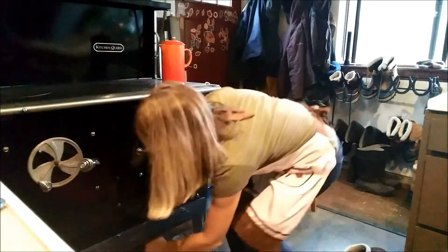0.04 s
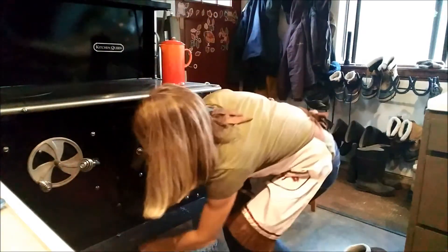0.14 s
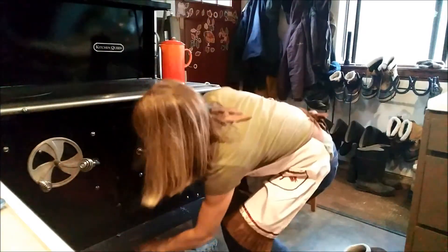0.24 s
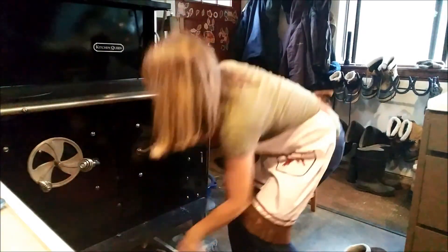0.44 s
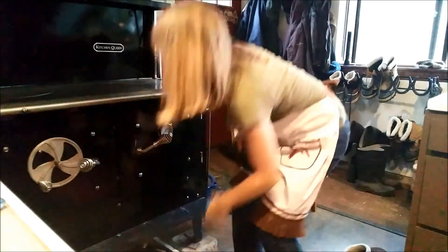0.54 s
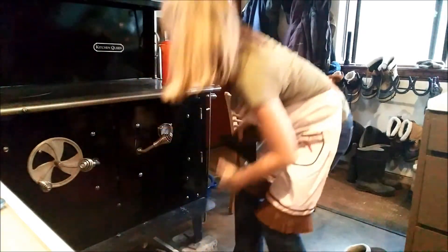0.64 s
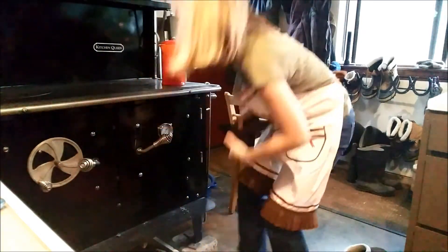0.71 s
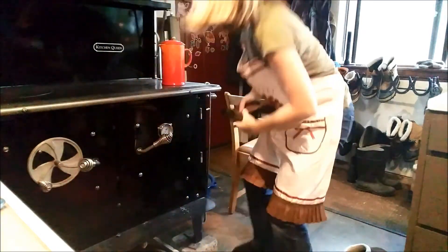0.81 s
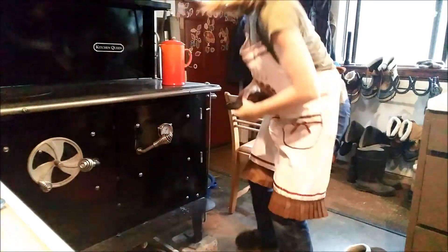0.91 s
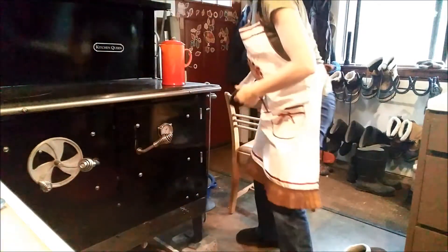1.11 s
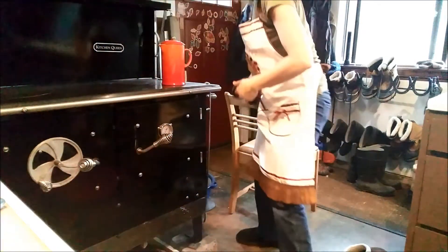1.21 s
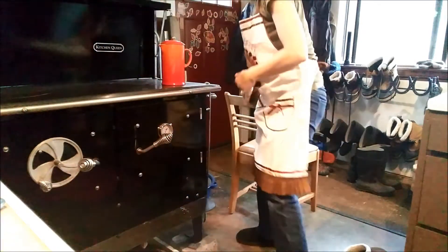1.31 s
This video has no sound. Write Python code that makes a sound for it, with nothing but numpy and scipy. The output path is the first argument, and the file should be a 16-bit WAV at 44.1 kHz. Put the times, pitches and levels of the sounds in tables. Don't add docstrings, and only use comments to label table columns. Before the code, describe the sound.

A heavy iron stove door shuts: faint handle knocks and a quick latch scrape, two loud rattling clanks, a fading ring, then slight cloth rustle and a soft shoe step, close stereo microphone in a small kitchen.

```python
import sys
import numpy as np
from scipy import signal
from scipy.fft import rfft, irfft, next_fast_len
from scipy.io import wavfile
from scipy.ndimage import uniform_filter1d, map_coordinates

SR = 44100
rng = np.random.default_rng(int(sys.argv[2]) if len(sys.argv) > 2 else 0)


def log_audio(samples):
    frames = np.atleast_2d(samples).T
    limited = np.clip(frames, -1, 1)
    pcm = np.round(limited * 32767).astype(np.int16)
    wavfile.write(sys.argv[1], SR, pcm)


def nominal_scale(level):
    x = np.asarray(level, float) / 20
    return 10 ** x


N = 59535

# t/s, level/dB, rattle/s, strongest f/Hz, brightness/dB per octave
CLANKS = [
    (0.2397, -17.5, 0.11, 5650, -2),
    (.276, -18, 0.017, 8650, -1.5),
    (.298, -26, 0.0097, 650, -2.5),
    (0.3186, -13, 0.019, 5420, 1),
    (.333, -15, 0.008, 672, 0.5),
    (.352, -15, 0.024, 1201, 0),
    (.498, -44.5, 0.0072, 5510, 1.5),
    (0.5064, -35, 0.0057, 4250, -2.5),
    (0.524, -44, 0.0034, 4100, -4.5),
]
# f/Hz, level/dB per Hz
IRON = [(60, -47.5), (250, -30), (600, -8), (1200, -7.5), (2500, -7.5), (5500, -3), (11000, -3.5),
        (16000, -4.5)]
# f/Hz, t60/s
IRON_T60 = [(80, 1.09), (300, 0.97), (700, 0.44), (2000, 0.45), (4500, 0.23), (10000, 0.19), (15000, 0.14)]
# f/Hz, level/dB
GLANCE = [(300, -7), (600, -2.5), (1000, -2), (1800, -7), (2400, 3.5), (4000, 0), (15000, -3)]
# t/s, level/dB, f/Hz
THUDS = [(.299, -22.5, 590), (.328, -24, 710), (.343, -23.5, 670), (0.32, -18, 1095), (.366, -24, 660),
         (.35, -25.5, 1750), (0.36, -22, 2700)]
LATCH_HZ = [5215, 5585, 5760, 5955, 6325, 6728, 8265]
LATCH_LEVEL_DB = [-10, -10.5, -6, -8, 2, -6.5, -6]
FRAME_HZ = [3931, 4490, 5215, 5412, 5455, 6728, 7926, 8074, 10665, 11254, 11524, 11974]
FRAME_LEVEL_DB = [-14, -6.5, -4.5, -6.5, -6, -5, -1, -4, -5.5, -11.5, -11.5, -11.5]
FRAME_T60 = [.4, .3, .28, .33, .28, .22, .25, .2, .17, .2, .2, .24]
PLATE_HZ = [305, 377, 541, 565, 625, 707, 765, 920, 1105, 1292, 1823]
# level/dB, t60/s
PLATES = [(-22.5, 0.46), (-19.5, 0.77), (-20.5, 1), (-20, 0.41), (-16, 0.76), (-9.5, 0.55), (-16.5, 0.37),
          (-9, 0.26), (-4.5, 0.26), (-9, 0.26), (-11, 0.31)]
DAMPER_HZ = [3220, 3750, 4250, 4800, 5740, 7010]
# level/dB, t60/s
DAMPER = [(4.5, .2), (2, .2), (-1.5, 0.32), (-7, 0.11), (-8, 0.13), (-10, 0.11)]
# f/Hz, level/dB, t60/s
BELLY = [(79.6, -2, 1.2), (125, -4, 1), (160, -3.5, 1.2), (286.3, -5.5, 1.2)]
# f/Hz, level/dB, t60/s
SETTLE = [(294.3, -40, 0.4), (454, -57.5, 1)]
# f/Hz, t60/s
KITCHEN_T60 = [(300, .7), (2000, 0.44), (6000, 0.61), (15000, .5)]
# f/Hz, twin f/Hz
SING_HZ = [(1185, 1198), (1725.5, 1729), (1994, 1997.2), (2218, 2221)]
# level/dB, t60/s, twin share, left-right turn/rad
SING = [(-32.5, .75, 1, 0.45), (-27, .75, 0.05, 0.73), (-36, 1.6, .1, 1), (-36.5, 0.92, 0.66, 0.53)]
# t/s, level/dB
MUTE = [(0, 0), (.72, 0), (.79, -11), (1.0, -11), (1.1, -20), (1.35, -20)]
# t/s, level/dB, rattle/s
KNOCKS = [
    (.078, -56.5, .04),
    (.103, -47, 0.0024),
    (.1105, -46, 0.0041),
    (.135, -54, 0.008),
    (.157, -50.5, 0.015),
    (.2068, -48.5, 0.004),
    (.221, -43.5, .01),
]
HANDLE_HZ = [300, 484, 673, 974, 1222, 1690, 2550, 3155]
# width/Hz, level/dB
HANDLE = [(50, -12), (50, -4.5), (50, 3), (50.1, -12.5), (45, -2), (69, -14.5), (69.6, -11.5),
          (71.05, -20.5)]
# f/Hz, level/dB per Hz
HANDLE_TICK = [(200, -27), (1000, -16.5), (2200, -15), (3100, -26), (3800, -37), (6000, -42),
               (15000, -43.5)]
# f/Hz, level/dB, t60/s
KNOB = [(668, -34, .12), (505, -43, .25), (1222, -42, .2), (974, -50, .2)]
# t/s, level/dB, f/Hz
TEETH = [
    (.172, -60, 7700),
    (.2068, -48, 5100),
    (.22, -43, 5350),
    (.2257, -38, 4690),
    (.233, -35.5, 5340),
]
# t/s, level/dB
SCRAPE = [(.19, -62), (.203, -54.5), (.218, -47.5), (.228, -40), (.2385, -34), (.242, -66)]
# f/Hz, level/dB per Hz
SCRAPE_COLOUR = [(120, -45), (200, -27), (671, -9), (1020, -15), (1240, -5), (1410, -18), (3870, -17),
                 (5260, -11), (15000, -28)]
# t/s, level/dB
FADING = [(0, -64), (.05, -66), (.1, -64)]
# f/Hz, level/dB per Hz
FADING_COLOUR = [(88, -70), (150, -31), (310, -1.5), (518, -25), (800, -6), (1040, -14), (1670, -12),
                 (3500, -27), (4550, -58), (7700, -120)]
# t/s, level/dB
RUSTLE = [(.775, -64.5), (.8, -64.5), (.822, -67), (.845, -67), (.87, -70)]
# f/Hz, level/dB per Hz
CLOTH = [(800, -9.5), (3000, -2.5), (5500, -2.5), (8000, -4), (14000, -9.5)]
# t/s, level/dB, f/Hz
SNAPS = [(.797, -75, 8000), (.808, -64, 5000), (.829, -70, 6700), (.837, -63, 7000), (.839, -63, 5000),
         (.846, -61, 8100)]
STEP_S = [1.1715, 1.184, 1.204, 1.2255, 1.2365, 1.25, 1.278]
STEP_HZ = [500, 378, 460, 373, 380, 330, 500]
# level/dB, length/s
STEPS = [(-55, 0.006), (-56.5, 0.016), (-63, 0.014), (-53, 0.021), (-59, 0.0073), (-59.5, 0.015),
         (-63.5, 0.0064)]
# share of the push's f, level/dB
BOARD = [(.85, 0), (1.25, -3), (2.1, -12)]
# f/Hz, level/dB per Hz
SOLE = [(150, -34.5), (400, 8), (900, -18), (1500, -21), (4000, -27)]
# t/s, level/dB
WEIGHT = [(1.2, -87), (1.25, -58), (1.29, -68), (1.35, -72)]
# f/Hz, level/dB per Hz
HUM = [(30, -14), (60, 0.5), (150, -12.5), (300, -17), (600, -6.5), (1100, -20), (3000, -28.5),
       (15000, -26)]
# t/s, level/dB
HUM_DB = [(0, -63.5), (1, -65.5), (1.35, -65)]
# f/Hz, likeness
ALIKE = [(60, 0.95), (300, 0.87), (700, 0.16), (1500, 0.21), (15000, 0.017)]
# f/Hz, level/dB
LEFT = [(2000, 0), (5500, -1), (8000, -5), (9200, -9), (11000, 8.5), (12500, -2.5), (14000, -5.5),
        (15600, -12.5)]
# f/Hz, level/dB
RIGHT = [(2000, 0), (5500, 1), (8000, 5), (9200, -1.5), (11000, -12), (12500, -7), (14000, -18),
         (15600, -16.5)]

FOCUS_DB, FOCUS_OCTAVES = 4.5, 0.4
CLUMP_DB, CLUMP_HZ = 1.8, 200
LATCH_S, FRAME_S, PLATE_S, BELLY_S = .2405, .319, .32, .31
LATCH_DB, FRAME_DB, PLATE_DB, BELLY_DB = -18, -17, -18.5, -45.5
LATCH_T60, THUD_T60, TOOTH_T60, SNAP_T60 = .2, .086, .06, .06
BELLY_RISE_S = 0.12
DAMPER_S, DAMPER_DB = .506, -44
SETTLE_S, KNOB_S = .425, .1105
KITCHEN_S, KITCHEN_DB = .335, -34
HEEL_DB = -64
LAG_S = .0002
NOTCH_HZ, NOTCH_WIDTH_HZ, NOTCH_DB = 9090, 350, -8.5
TOP_HZ, CLIP = 15660, 1.15


def unit(x):
    return x / np.sqrt(np.mean(x ** 2) + 1e-20)


def along(points, hz):
    f, v = np.transpose(points)
    return np.interp(np.log(hz + 1), np.log(f + 1), v)


def level(rows):
    s, db = np.transpose(rows)
    return nominal_scale(np.interp(np.arange(N) / SR, s, db, left=-140, right=-140))


def filtered(x, response):
    m = next_fast_len(x.shape[-1] + 8192)
    spectrum = rfft(x, m) * response(np.fft.rfftfreq(m, 1 / SR))
    return irfft(spectrum, m)[..., :x.shape[-1]]


def causal(db):
    c = irfft(np.log(nominal_scale(db) + 1e-6))
    half = c.shape[-1] // 2
    return np.exp(rfft(c * np.r_[1, np.full(half - 1, 2), 1, np.zeros(half - 1)]))


def pair(size):
    def shares(hz):
        turn = np.arccos(np.clip(along(ALIKE, hz), -1, 1)) / 2
        return np.array([np.cos(turn), np.sin(turn)])

    mid, side = filtered(rng.standard_normal((2, size)), shares)
    return np.array([mid + side, mid - side])


def add(out, s, x):
    part = out[:, round(s * SR):][:, :x.shape[1]]
    part += x[:, :part.shape[1]]


def grit(size, spread_db):
    return rng.standard_normal(size) * nominal_scale(spread_db * rng.exponential(size=size))


def contact(rattle_s, t60s, colour, size):
    hz, t, z = signal.stft(pair(size), SR, nperseg=128)
    dying = z * nominal_scale(-60 * t / t60s(hz)[:, None])
    tail = signal.istft(dying, SR, nperseg=128)[1][:, :size]
    u = np.arange(SR // 10) / SR
    hits = rng.random(len(u)) < .03
    rattle = hits * grit(len(u), spread_db=2.5) * np.exp(-u / max(rattle_s, .001))
    rattle[0] = 6.5
    knots = rng.standard_normal(1000)
    clumps = lambda hz: causal(CLUMP_DB * map_coordinates(knots, [hz / max(CLUMP_HZ, 30)]))
    struck = signal.fftconvolve(tail, rattle[None], axes=1)[:, :size]
    x = filtered(struck, lambda hz: colour(hz) * clumps(hz))
    return x / np.sqrt(np.mean(x[:, :SR // 25] ** 2))


def ring(modes, attack_s, beat, split):
    t, x = np.arange(SR) / SR, 0
    for hz, db, t60 in modes:
        d = rng.standard_normal((2, 2, 1))
        turn = d[0] * (.35 + min(hz / 2000, .9))
        wave = np.sin(2 * np.pi * hz * t + turn)
        twin = np.sin(2 * np.pi * hz * (1 + split) * t + turn)
        x = x + nominal_scale(db + d[1] - 60 * t / t60) * (wave + beat * twin)
    return x * (1 - np.exp(-t / attack_s))


def ticks(rows, t60):
    out = np.zeros((2, N))
    for s, db, pitch_hz in rows:
        bunch = [(pitch_hz * share, -5, t60) for share in (.95, 1, 1.06)]
        add(out, s, nominal_scale(db) * ring(bunch, .001, beat=.5, split=.015))
    return out


def rub(rows, colour, spread_db):
    x = pair(N) * np.abs(grit(N, spread_db))
    return level(rows) * unit(filtered(x, lambda hz: nominal_scale(along(colour, hz))))


def clanks():
    out = np.zeros((2, N))
    for k, (s, db, rattle_s, focus_hz, tilt_db) in enumerate(CLANKS):
        def colour(hz):
            octaves_off = np.log2((hz + 1) / focus_hz)
            focus = FOCUS_DB * np.exp(-(octaves_off / FOCUS_OCTAVES) ** 2)
            tilt = tilt_db * np.log2((hz + 50) / 3000)
            glance = (k == 0) * along(GLANCE, hz)
            return causal(along(IRON, hz) + glance + tilt + focus)

        blow = contact(rattle_s, lambda hz: along(IRON_T60, hz), colour, size=SR * 3 // 4)
        add(out, s, nominal_scale(db) * blow)
    return out


def door_parts():
    out = np.zeros((2, N))
    latch_modes = [(hz, db, LATCH_T60) for hz, db in zip(LATCH_HZ, LATCH_LEVEL_DB)]
    frame_modes = np.c_[FRAME_HZ, FRAME_LEVEL_DB, FRAME_T60]
    add(out, SETTLE_S, ring(SETTLE, 0.015, beat=0.15, split=0.023))
    add(out, LATCH_S, nominal_scale(LATCH_DB) * ring(latch_modes, 0.003, beat=0.45, split=0.0034))
    add(out, FRAME_S, nominal_scale(FRAME_DB) * ring(frame_modes, 0.00056, beat=.45, split=0.0018))
    add(out, PLATE_S, nominal_scale(PLATE_DB) * ring(np.c_[PLATE_HZ, PLATES], .015, beat=.7, split=.012))
    add(out, DAMPER_S, nominal_scale(DAMPER_DB) * ring(np.c_[DAMPER_HZ, DAMPER], 0.00095, beat=0.63, split=0.01))
    add(out, BELLY_S, nominal_scale(BELLY_DB) * ring(BELLY, BELLY_RISE_S, beat=1.0, split=0.16))
    return out


def top_plate():
    out, t = np.zeros((2, N)), np.arange(SR) / SR
    for (hz, twin_hz), (db, t60, share, turn) in zip(SING_HZ, SING):
        side = turn * np.array([[1], [-1]])
        wave = np.sin(2 * np.pi * hz * t + side) + share * np.sin(2 * np.pi * twin_hz * t)
        add(out, PLATE_S, nominal_scale(db - 60 * t / t60) * wave * (1 - np.exp(-t / 0.017)))
    return out * level(MUTE)


def handle():
    out = np.zeros((2, N))

    def body(f):
        response = causal(along(HANDLE_TICK, f))
        for k, (centre, width, db) in enumerate(np.c_[HANDLE_HZ, HANDLE]):
            peak = 1j * f * width / (centre * centre - f * f + 1j * f * width)
            response = response + (-1) ** k * nominal_scale(db) * peak
        return response

    t60s = lambda hz: along([(300, 0.27), (3000, 0.15)], hz)
    add(out, KNOB_S, ring(KNOB, 0.0012, beat=0.22, split=0.075))
    for s, db, rattle_s in KNOCKS:
        add(out, s, nominal_scale(db) * contact(rattle_s, t60s, body, size=SR // 3))
    return out


def latch():
    return ticks(TEETH, TOOTH_T60) + rub(SCRAPE, SCRAPE_COLOUR, spread_db=1.0)


def cloth():
    return rub(RUSTLE, CLOTH, spread_db=0.5) + ticks(SNAPS, SNAP_T60)


def shoe():
    out, t = np.zeros((2, N)), np.arange(SR // 10) / SR
    for s, pitch_hz, db, length_s in np.c_[STEP_S, STEP_HZ, STEPS]:
        push = sum(nominal_scale(part_db) * np.sin(2 * np.pi * pitch_hz * share * t) for share, part_db in BOARD)
        shape = (1 - np.exp(-t / 0.0019)) / (1 + (t / length_s) ** 6)
        add(out, s, nominal_scale(db) * push * shape * nominal_scale([[-.6], [.6]]))
        sole = lambda hz: causal(along(SOLE, hz))
        scuff = contact(0.0088, lambda hz: 0 * hz + 0.076, sole, size=SR // 6)
        add(out, s, nominal_scale(db - 10) * scuff)
    heel_points = [(200, -4), (800, 4), (1500, -25), (3000, -23), (12000, -30)]  # f/Hz, level/dB per Hz
    heel_colour = lambda hz: causal(along(heel_points, hz))
    heel = contact(0.0014, lambda hz: 0 * hz + 0.089, heel_colour, size=SR // 6)
    add(out, STEP_S[0], nominal_scale(HEEL_DB) * heel)
    creep_colour = [(30, -7.0), (60, 2.0), (130, -7.5), (260, -42), (1000, -33.5)]  # f/Hz, level/dB per Hz
    return out + rub(WEIGHT, creep_colour, spread_db=-1.8)


def kitchen():
    out = np.zeros((2, N))
    colour = lambda hz: causal(along(IRON, hz))
    late = contact(0.013, lambda hz: along(KITCHEN_T60, hz), colour, size=SR)
    add(out, KITCHEN_S, nominal_scale(KITCHEN_DB) * late)
    return out


def hum():
    z = signal.stft(pair(N), nperseg=512)[2]
    patches = uniform_filter1d(rng.standard_normal(z.shape[1:]), 5, 0)
    patches = uniform_filter1d(patches, 10, 1)
    x = signal.istft(z * nominal_scale(1.3 * unit(patches)), nperseg=512)[1][:, :N]
    return level(HUM_DB) * unit(filtered(x, lambda hz: nominal_scale(along(HUM, hz))))


def scene():
    stove = clanks() + door_parts() + ticks(THUDS, THUD_T60) + handle() + latch() + kitchen()
    lag = np.array([[LAG_S], [0]])
    stove = filtered(stove, lambda hz: np.exp(-2j * np.pi * hz * lag))
    earlier_knock = rub(FADING, FADING_COLOUR, spread_db=3.0)
    return stove + top_plate() + earlier_knock + cloth() + shoe() + hum()


def top_cut(x):
    return signal.sosfilt(signal.butter(12, 15660, fs=SR, output="sos"), x)


def record(dry):
    def ports(hz):
        dip = NOTCH_DB * np.exp(-((hz - NOTCH_HZ) / NOTCH_WIDTH_HZ) ** 2)
        colour = np.array([along(LEFT, hz), along(RIGHT, hz)])
        return causal(colour + dip) * (hz < TOP_HZ)

    x = filtered(dry, ports)
    mix = x / (1 + np.abs(x / CLIP) ** 4) ** (1 / 4)
    return top_cut(mix)


dry = scene()
out = record(dry)
log_audio(out)
```